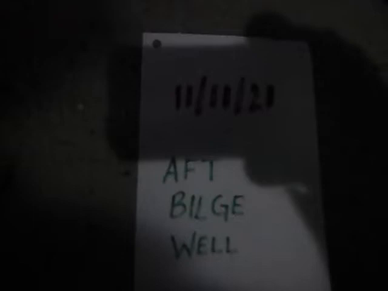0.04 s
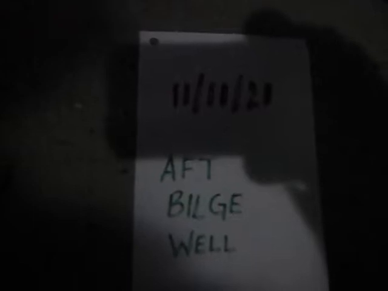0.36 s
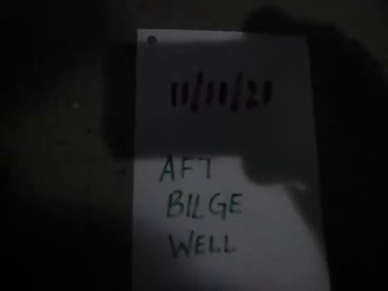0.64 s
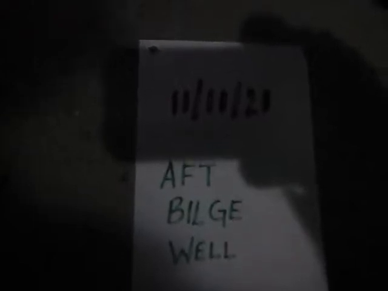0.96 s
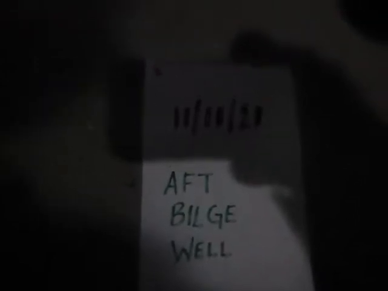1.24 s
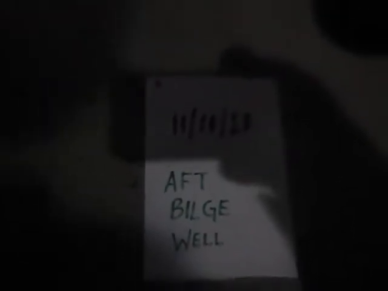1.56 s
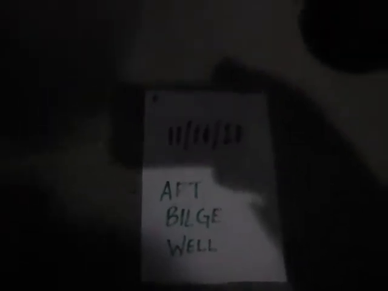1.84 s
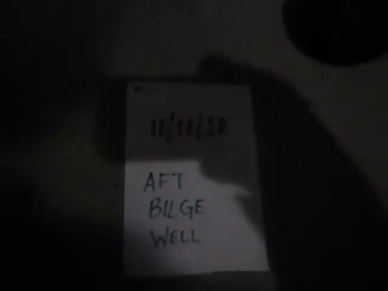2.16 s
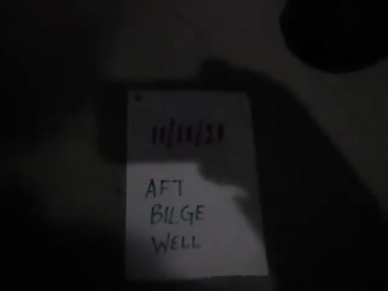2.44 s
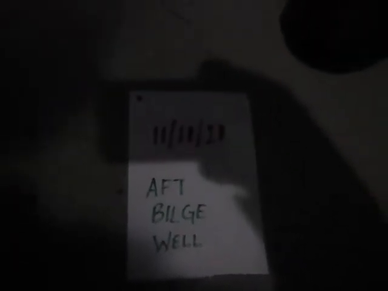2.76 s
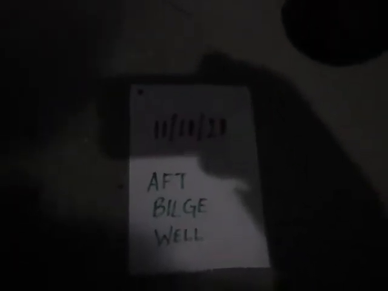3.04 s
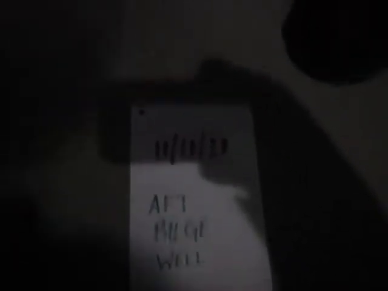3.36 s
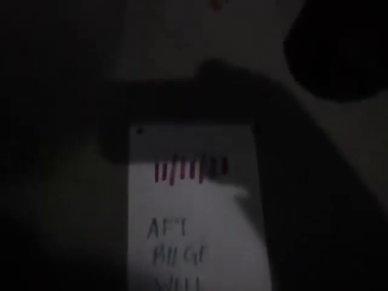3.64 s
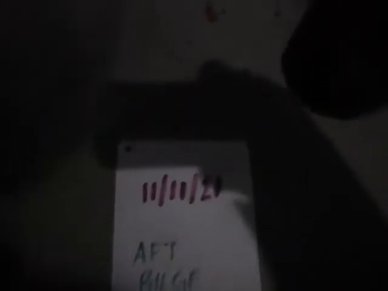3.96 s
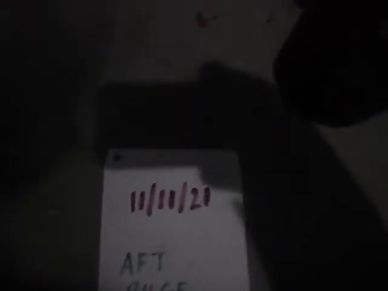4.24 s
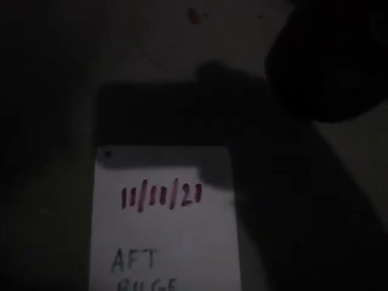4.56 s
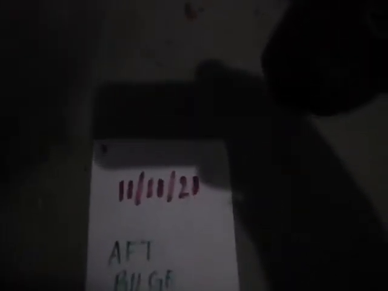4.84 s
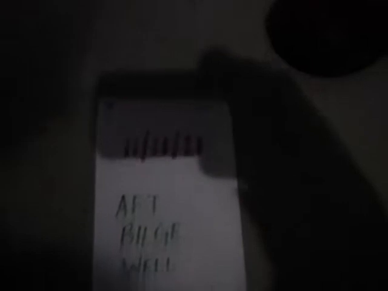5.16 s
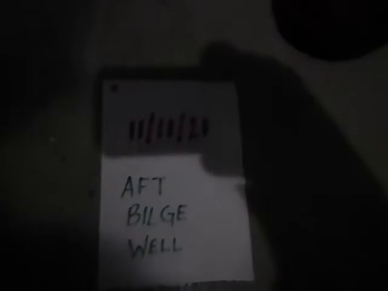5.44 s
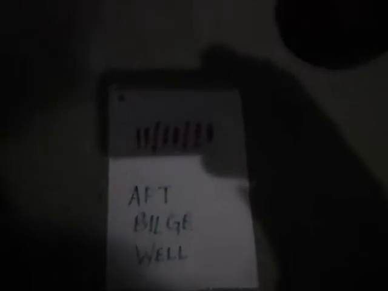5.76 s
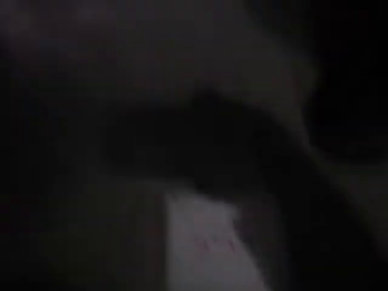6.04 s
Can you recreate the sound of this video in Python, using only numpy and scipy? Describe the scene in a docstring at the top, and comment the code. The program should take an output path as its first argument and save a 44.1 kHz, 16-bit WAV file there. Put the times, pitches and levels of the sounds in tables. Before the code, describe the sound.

After a brief silence, the sound of a ship's engine room cuts in with a click at about 0.2 seconds. Two diesel generators make a strong, low booming hum with a throbbing rumble and rapid clatter, joined by humming pumps, roaring fans and a faint turbocharger hiss. The machinery runs without a break. Faint metallic hisses swell briefly several times between 0.5 and 3 seconds. Dull clunks, half buried in the roar, come around 1.4, 3, 4.3 and 5 seconds. From 2.5 seconds the boom fades as the microphone moves through the steel room; a slightly higher hum swells around 3.3 seconds, and a faint metallic ring follows until about 4 seconds. The roar then softens a little. The boom returns between 4.5 and 5.3 seconds, slightly weaker than before, and the drone continues to the end at about 6 seconds.

```python
"""A ship's engine room, low over the bilge; the sound cuts in abruptly with a click.
Two diesel generators near 900 rpm radiate harmonics of their firing cycles, which boom and beat,
while their cylinders clatter. Pumps hum, fans roar and a turbocharger hisses; now and then a faint
metallic hiss swells near 3 kHz or something clunks. As the listener moves through the steel room's
standing waves, the boom fades at a pressure node and other hums come forward."""
import sys
import numpy as np
from scipy import signal
from scipy.fft import rfft, irfft, next_fast_len
from scipy.io import wavfile

SR = 44100
rng = np.random.default_rng(int(sys.argv[2]) if len(sys.argv) > 2 else 0)


def unload_audio(sound):
    """Save the sound as a 16-bit wav file, at the path given as the first command line argument."""
    columns = np.transpose(np.atleast_2d(sound))
    # keep every value between -1 and 1, then stretch to whole-number steps
    steps = np.round(np.clip(columns, -1, 1) * 32767)
    wavfile.write(sys.argv[1], SR, steps.astype(np.int16))


N = 268569


def undb(db):
    """Amplitude ratio of a level in decibels."""
    return 10 ** (np.asarray(db) / 20)


def unit(x):
    """Normalisation to an rms of one."""
    return x / np.sqrt(np.mean(x ** 2))


def ramp(start_s, fade_s):
    """Linear rise from 0 to 1, then a hold."""
    return np.clip((np.arange(N) / SR - start_s) / fade_s, 0, 1)


def wander(rate_hz):
    """Slow random modulation with an rms of one."""
    steps = np.arange(N) * 2 * rate_hz / SR
    knots = rng.standard_normal(int(steps[-1]) + 2)
    whole = steps.astype(int)
    ease = np.sin(np.pi / 2 * (steps - whole)) ** 2
    return unit(knots[whole] + ease * np.diff(knots)[whole])


def tone(turns):
    """Simple harmonic motion with an rms of one and a random starting phase."""
    return np.sin(2 * np.pi * (turns + rng.random())) * np.sqrt(2)


def hum(pitch_hz, drift, flutter_db):
    """Frequency and amplitude modulation: a tone whose pitch drifts and whose level flutters."""
    turns = np.cumsum(pitch_hz * (1 + drift * wander(1.41))) / SR
    return tone(turns) * undb(flutter_db * wander(5.6))


# Nodes (-) and antinodes (+) along the listener's path, keyed boom, bass, ring, hum, rumble, whistle:
# enter_s, fade_in_s, leave_s, fade_out_s, change_db
STANDING_WAVES = { "boom": (2.5, 0.65, 4.5, 0.84, -14), "bass": (2.45, 1.2, 5, 0.2, -14),
                  "ring": (3.1, 0.34, 3.85, .35, 8.2), "hum": (2.85, .4, 3.49, 0.48, 12.8),
                  "rumble": (3.5, 2, 5, 1.5, -4), "whistle": (1.59, .06, 1.92, .65, 11.2), }

def standing_wave_db(name):
    """Standing waves: the level falls across a pressure node and rises across an antinode."""
    enter_s, fade_in_s, leave_s, fade_out_s, change_db = STANDING_WAVES[name]
    return change_db * (ramp(enter_s, fade_in_s) - ramp(leave_s, fade_out_s))


def harmonics(cycles, table, node):
    """Periodic firing radiates multiples (orders) of the cycle rate; `node` blends their two levels."""
    return sum(tone(order * cycles) * undb(db + (node_db - db) * node + 0.6 * wander(0.845))
               for order, db, node_db in table)


# Weaker harmonics of the main generator, before a common trim: order, level_db, level_in_node_db
MAIN_HARMONICS = [(9, -53, -51), (11, -51, -55), (14, -38.5, -47), (15, -38.5, -44), (18, -48, -55),
                  (20, -44, -52), (22, -44, -52), (26, -41.5, -54), (30, -45, -52), (31, -42.5, -52),
                  (32, -45.5, -52), (34, -41, -47), (35, -44, -44), (36, -44, -48), (37, -44, -48),
                  (39, -45, -50), (40, -41, -51), (41, -47, -54), (44, -42.5, -53), (52, -49, -53),
                  (55, -48, -52), (74, -44, -51), (80, -49, -56), (96, -53, -58), (99, -50, -53),
                  (110, -52, -58), (120, -50.5, -52)]

def main_generator(cycles, boom_db, bass_db, node):
    """Forced resonance: two harmonics of the four-stroke cycle excite room modes."""
    boom = tone(25 * cycles) * undb(boom_db)
    bass = tone(10 * cycles) * undb(bass_db)
    return boom + bass + undb(-0.57) * harmonics(cycles, MAIN_HARMONICS, node)


# Harmonics of the slower generator, before a common trim: order, level_db, level_in_node_db
SLOW_HARMONICS = [(10, -54, -48), (14, -52, -43), (15, -52, -43), (16, -50, -43), (23, -55, -48),
                  (24, -55, -46), (25, -49, -35), (26, -50, -39), (40, -49, -43)]

def slow_generator(cycles, hum_db, node):
    """Beating: these harmonics lie just below the main engine's; the 30th swells into a hum."""
    return undb(-0.2) * harmonics(cycles, SLOW_HARMONICS, node) + tone(30 * cycles) * undb(hum_db)


# Hums and whines of pump and fan motors: pitch_hz, level_db, level_in_node_db
MOTOR_TONES = [(258.4, -47, -46), (263.3, -48, -38.5), (268.5, -46, -40.5), (414.5, -45.5, -48),
               (614, -62, -52), (1252, -61, -64), (1367, -59.5, -66), (1389, -66, -58),
               (1416.5, -58.5, -62), (4230, -84, -84)]

def pumps(node):
    """Rotating motors radiate unrelated tones that drift with load and vary in level with position."""
    return sum(hum(hz, drift=0.001077, flutter_db=2.0) * undb(db + (node_db - db) * node)
               for hz, db, node_db in MOTOR_TONES)


# Resonances of the deck plates: centre_hz, width_hz, lift_db
PLATE_MODES = [(167, 10, 2), (265, 35, 3), (297, 14, 2), (355, 12, 3), (390, 14, 3), (445, 18, 2.5),
               (615, 35, 1), (825, 16, 2.5), (1045, 25, 2), (2160, 80, 2.5)]

def colour(excitation, spectrum):
    """Source and filter: a broad spectrum and the plate resonances shape a sound, returned at unit rms."""
    size = next_fast_len(N)
    hz = np.maximum(np.arange(size // 2 + 1) * SR / size, 1)
    points_hz, points_db = np.transpose(spectrum)
    db = np.interp(np.log(hz), np.log(points_hz), points_db)
    octaves_outside = abs(np.log2(hz / np.clip(hz, points_hz[0], points_hz[-1])))
    db = db - 36 * octaves_outside
    for centre_hz, width_hz, lift_db in PLATE_MODES:
        db = db + lift_db / (1 + (2 * (hz - centre_hz) / width_hz) ** 2)
    return unit(irfft(rfft(excitation, size) * undb(db), size)[:N])


def cyclic_noise(cycles, correlation):
    """Quasi-periodic noise: each engine cycle is partly correlated with the one before."""
    size = int(N / cycles[-1])
    patterns = rng.standard_normal((int(cycles[-1]) + 1, size))
    for k in range(1, len(patterns)):
        kept = np.clip(correlation[np.searchsorted(cycles, k)], 0, .98)
        patterns[k] = kept * patterns[k - 1] + np.sqrt(1 - kept ** 2) * patterns[k]
    return patterns.ravel()[(cycles * size).astype(int)]


# Spectrum of the vibrating hull: frequency_hz, relative_db
HULL_SPECTRUM = [(20, -23), (32, -13.5), (45, -10.5), (54, -23), (66, -7.5), (88, -8.5), (100, 3),
                 (113, 2.5), (128, -1.5), (160, -1.5), (200, -3.5), (260, -11)]

def hull_rumble(cycles, correlation):
    """Structure-borne sound: the engine shakes the hull into a low, loosely repeating noise."""
    return colour(cyclic_noise(cycles, .75 * correlation), HULL_SPECTRUM)


# The six cylinders in firing order: arrival_cycles, strength_db
FIRINGS = [(.13, 0), (.27, -1), (.42, -4), (.58, 0), (.75, 3), (.92, 1)]

def firing_envelope(cycles, decay_s, scatter_db):
    """Reverberant decay: the room smears each cylinder's impulse into an exponential tail."""
    blows = np.zeros(N)
    for arrival, db in FIRINGS:
        at = np.flatnonzero(np.diff(np.floor(cycles - arrival)))
        blows[at] += undb(db + scatter_db * rng.standard_normal(len(at)))
    return unit(signal.lfilter([1], [1, -np.exp(-1 / (decay_s * SR))], blows))


def clatter(cycles, correlation, decay_s, scatter_db=0.0):
    """Impulsive excitation: every firing releases a decaying burst of noise."""
    return firing_envelope(cycles, decay_s, scatter_db) * cyclic_noise(cycles, correlation)


# A broad room resonance: frequency_hz, relative_db
DRONE_SPECTRUM = [(205, -8), (238, -1), (255, -3), (275, 5), (292, -4.5), (310, -12.5)]

def room_drone(cycles, correlation, node):
    """A room resonance driven by the firings, loudest where the boom is weak."""
    thuds = clatter(cycles, correlation, decay_s=0.0074)
    return colour(thuds, DRONE_SPECTRUM) * undb(-43.5 + 7 * node)


# Spectrum of the fans and engine clatter together: frequency_hz, relative_db
ROAR_SPECTRUM = [(130, -20.5), (200, 1), (250, -1.5), (300, -2), (340, -7), (420, -4), (490, -8),
                 (630, -5.5), (780, -9), (930, -6.5), (1200, -15), (1400, -17), (1800, -23), (3200, -39.5)]
THROB_PHASE_CYCLES = 0.51  # where in the slower engine's cycle the roar and hiss peak

def machinery_roar(cycles, slow_cycles, correlation):
    """Incoherent addition: the clatter of both engines and the noise of fans merge into a roar."""
    main_clatter = clatter(cycles, correlation, decay_s=0.051)
    slow_firings = firing_envelope(slow_cycles - THROB_PHASE_CYCLES, decay_s=0.025, scatter_db=0.9)
    slow_clatter = slow_firings * cyclic_noise(slow_cycles, correlation)
    fans = rng.standard_normal(N) * undb(0.92 * wander(16))
    return colour(main_clatter + undb(-5) * (slow_clatter + fans), ROAR_SPECTRUM)


# Spectrum of air rushing through the turbocharger: frequency_hz, relative_db
AIR_SPECTRUM = [(1000, -5.5), (2100, 2), (2500, -1), (2900, 1), (4000, -6), (5200, -9.5), (6800, -13.5),
                (8200, -12), (9000, -5), (9600, -8), (10500, -16), (12000, -23.5), (15000, -37.5),
                (17000, -36)]

def turbocharger(cycles, hiss_db):
    """Flow noise, amplitude-modulated by the cylinders, with two thin whistles."""
    air = rng.standard_normal(N) * (1 + .38 * firing_envelope(cycles, decay_s=.028, scatter_db=1.4))
    whistle = hum(8963, drift=.00015, flutter_db=1.2) * undb(-78 + standing_wave_db("whistle"))
    side_whistle = hum(9135, drift=0.00088, flutter_db=1.5) * undb(-82)
    return colour(air, AIR_SPECTRUM) * undb(hiss_db) + whistle + side_whistle


# Brief swells and dips of the roar, which the hiss partly follows: centre_s, change_db, half_width_s
ROAR_SWELLS = [(.65, .8, .4), (1.44, 1.9, 0.07), (1.565, -3, 0.028), (2.0, -.7, .3), (2.58, -2.5, 0.052),
               (2.98, 0.8, 0.33), (4.5, 2.5, 0.15), (5.19, 2, 0.15), (5.84, 0, .04), (6.07, 2, 0.11)]

def swells_db():
    """Slow amplitude modulation: a sum of Gaussian rises and dips in level."""
    t = np.arange(N) / SR
    return sum(db * np.exp(-((t - centre_s) / width_s) ** 2) for centre_s, db, width_s in ROAR_SWELLS)


# Spectrum of a faint metallic hiss: frequency_hz, relative_db
FLARE_SPECTRUM = [(2200, -23), (2510, 3), (2660, -17), (2860, 2), (3020, -14), (3400, -16), (3740, -8),
                  (4100, -23)]
# Its brief swells: start_s, length_s, level_db
HISS_FLARES = [(.46, 0.09, -60), (0.714, .19, -58), (1.268, 0.24, -60), (2.418, .09, -57), (2.8, 0.11, -58),
               (3.05, .03, -56)]

def hiss_flares():
    """Amplitude-modulated band noise: brief, faint swells of metallic hiss near 3 kHz."""
    envelope = sum(undb(db) * (ramp(start_s, fade_s=.02) - ramp(start_s + length_s, fade_s=0.035))
                   for start_s, length_s, db in HISS_FLARES)
    return envelope * colour(rng.standard_normal(N), FLARE_SPECTRUM)


# Dull knocks in the machinery: start_s, level_db
CLUNK_BLOWS = [(1.392, -25.5), (1.517, -26), (2.822, -23.5), (2.892, -27.5), (3.063, -22.5), (4.349, -21.5),
               (4.919, -26.5), (5.183, -25)]
# What they ring with: frequency_hz, relative_db
CLUNK_SPECTRUM = [(280, 4), (420, 4.5), (650, 2.5), (950, -4), (1500, -18.5), (2500, -29.5)]

def clunks(attack_s=0.0027, decay_s=0.014):
    """Heavily damped impacts: dull bursts that decay exponentially, half masked by the roar."""
    t = np.arange(N) / SR
    blows = sum(undb(db) * ramp(start_s, attack_s) * np.exp(-np.maximum(t - start_s, 0) / decay_s)
                for start_s, db in CLUNK_BLOWS)
    return blows * colour(rng.standard_normal(N), CLUNK_SPECTRUM)


# A metallic ring, away from its antinode: pitch_hz, level_db
RING_TONES = [(1036, -60), (1050, -58)]

def metal_ring():
    """Two close tones beat together and stand out at their antinode."""
    return sum(hum(hz, drift=0.00151, flutter_db=2.0) * undb(db + standing_wave_db("ring"))
               for hz, db in RING_TONES)


MAIN_CYCLE_HZ, SLOW_CYCLE_HZ = 7.497, 7.352  # one four-stroke cycle takes two revolutions

def scene():
    """Superposition: all the machines sound together, and the listener's position sets their balance."""
    cycles = np.cumsum(MAIN_CYCLE_HZ * (1 + 0.00062 * wander(1.517))) / SR
    slow_cycles = np.cumsum(SLOW_CYCLE_HZ * (1 + 0.00078 * wander(1.54))) / SR
    node_db = standing_wave_db("boom")
    node = node_db / node_db.min()  # depth into the boom's node, 0 to 1
    shelter = ramp(3.66, fade_s=0.47)  # the listener reaches a more sheltered place
    held_node = np.maximum(node, 0.51 * shelter)  # about half the node's balance persists there
    # The clatter repeats less exactly once the listener moves through the echoes.
    correlation = .88 - .53 * ramp(2.19, fade_s=0.64)

    boom_change_db = node_db - 3 * shelter
    swell_db = swells_db()
    throb_db = .6 * np.cos(2 * np.pi * (slow_cycles - THROB_PHASE_CYCLES))
    rumble_db = -34 + 0.029 * boom_change_db + standing_wave_db("rumble")
    roar_db = -30.5 - 2 * shelter + swell_db + throb_db
    hiss_db = -51.5 - 2.5 * shelter + 0.66 * swell_db + 0.48 * throb_db

    mix = main_generator(cycles, -25 + boom_change_db, -36 + standing_wave_db("bass"), held_node)
    mix += slow_generator(slow_cycles, -41 + standing_wave_db("hum"), node)
    mix += pumps(held_node)
    mix += hull_rumble(cycles, correlation) * undb(rumble_db)
    mix += room_drone(cycles, correlation, held_node)
    mix += machinery_roar(cycles, slow_cycles, correlation) * undb(roar_db)
    mix += turbocharger(cycles, hiss_db)
    return (mix + hiss_flares() + clunks() + metal_ring())[None]


# Narrow bands missing from the sound: centre_hz, width_hz
STOP_BANDS = [(1910, 128), (2400, 73)]
ONSET_S, CUTOFF_HZ = .2219, 15600

def record(dry):
    """Filtering and gating: two notches, an abrupt onset with a click, and a steep low-pass."""
    for centre_hz, width_hz in STOP_BANDS:
        dry = signal.lfilter(*signal.iirnotch(centre_hz, centre_hz / width_hz, fs=SR), dry)
    since_s = np.arange(N) / SR - ONSET_S
    click = undb(-14.5) * np.exp(-np.maximum(since_s, 0) / 0.00025)
    gated = (dry + click) * (since_s >= 0)
    return signal.sosfilt(signal.ellip(8, .2, 70, CUTOFF_HZ, fs=SR, output="sos"), gated)


dry = scene()
out = record(dry)
unload_audio(out)
```